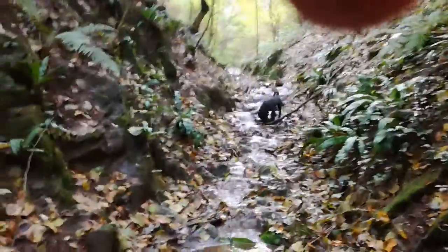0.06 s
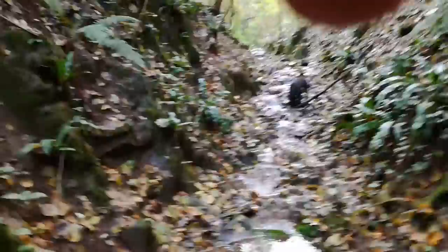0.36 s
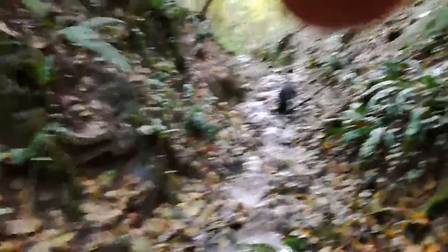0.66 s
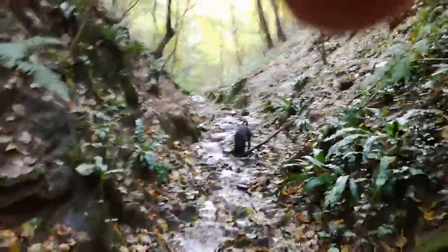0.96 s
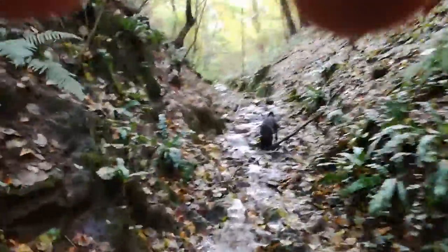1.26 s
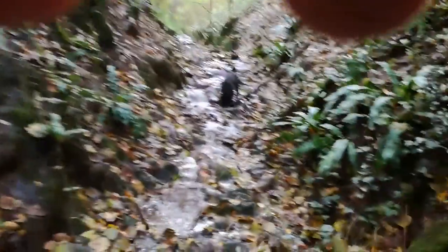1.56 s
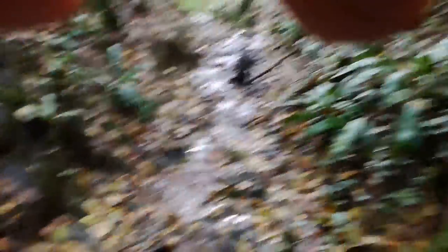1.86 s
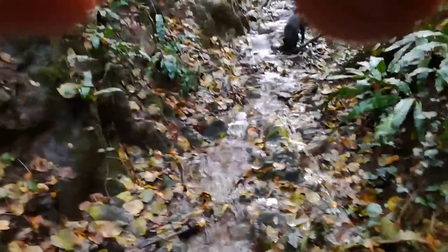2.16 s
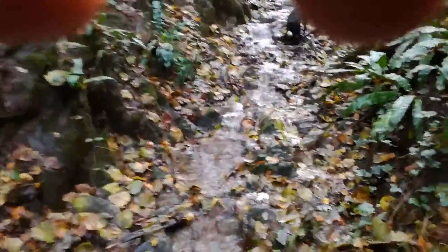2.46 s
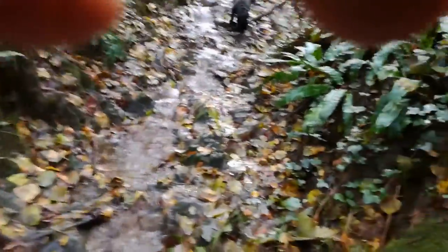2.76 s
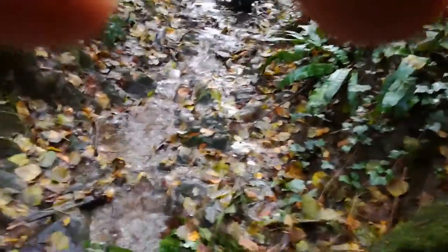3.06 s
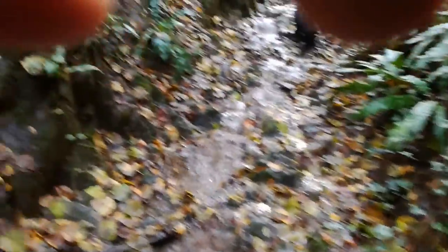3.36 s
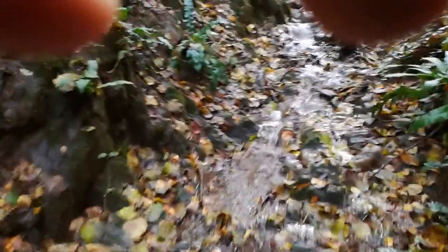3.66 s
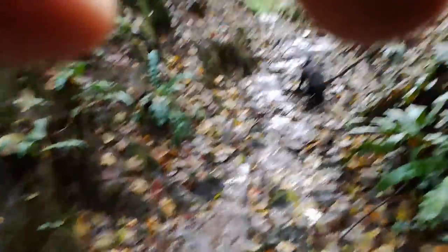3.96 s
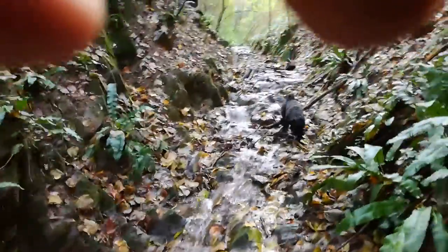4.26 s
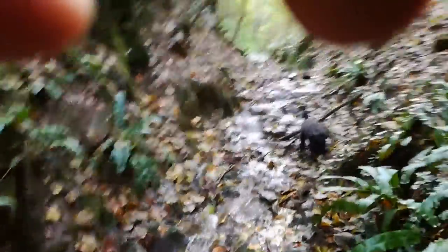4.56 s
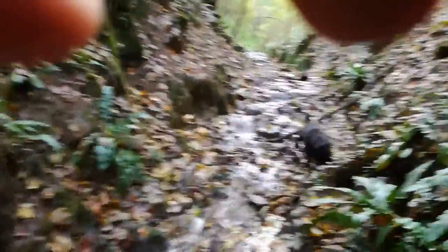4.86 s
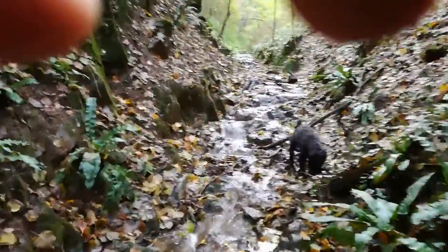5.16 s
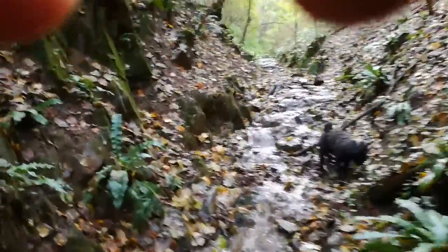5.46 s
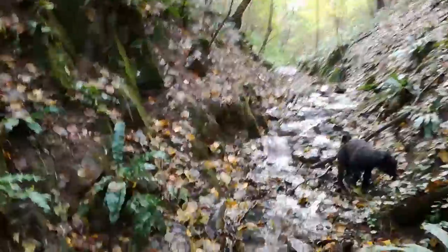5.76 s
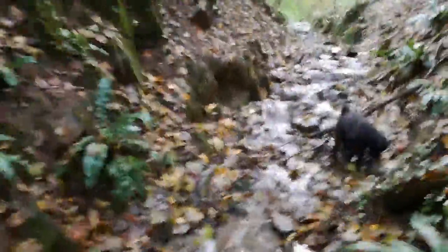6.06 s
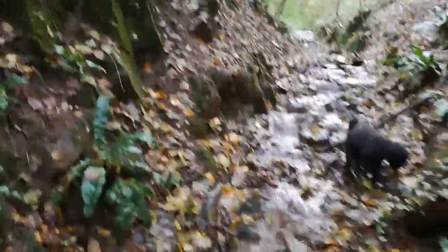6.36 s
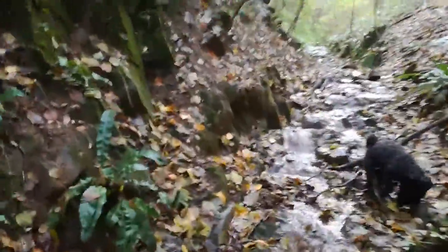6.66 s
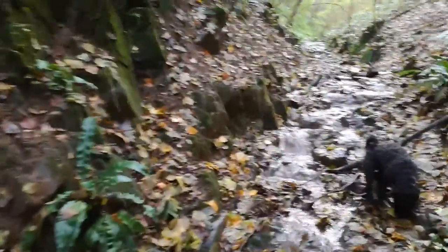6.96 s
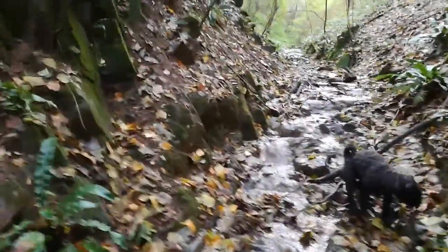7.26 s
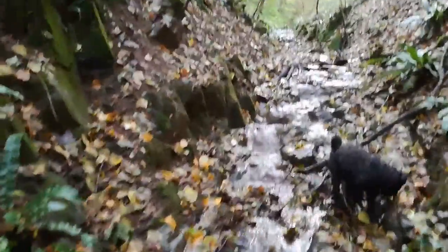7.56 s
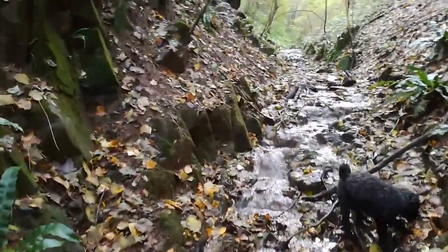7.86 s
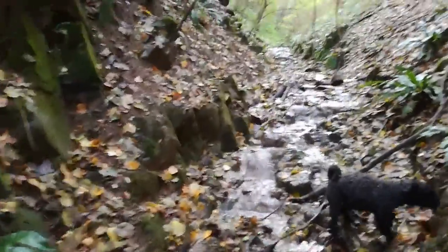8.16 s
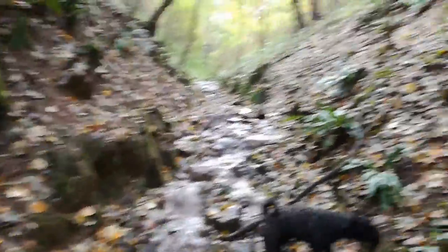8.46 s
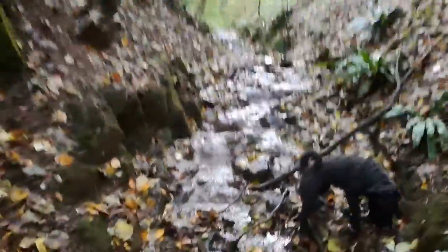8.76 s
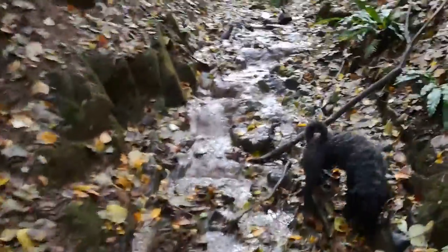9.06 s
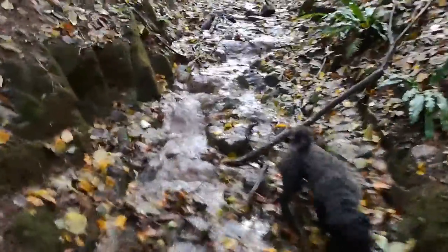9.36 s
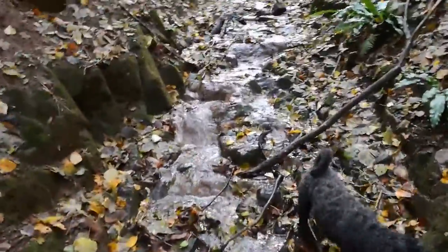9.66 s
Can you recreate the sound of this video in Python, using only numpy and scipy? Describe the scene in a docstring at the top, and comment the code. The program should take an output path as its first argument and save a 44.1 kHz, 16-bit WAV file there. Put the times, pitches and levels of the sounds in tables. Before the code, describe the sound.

A shallow forest stream trickles and bubbles steadily over stones while footsteps rustle wet leaves and snap twigs.

```python
"""A shallow stream trickles over stones in a leafy gully: countless small bubbles ring in the riffles,
each a pocket of air resonating against the water around it. Steps thud, rustle wet leaves, snap twigs
and knock loose stones, and in the second half a dog noses through the leaves. All is heard at the two
microphone ports of a hand-held camera: the left faces away from the water and lies in acoustic shadow,
while a finger slides over the right and cancels a moving band of the water's treble."""
import sys
import numpy as np
from scipy import signal
from scipy.fft import irfft
from scipy.io import wavfile

SR = 44100
rng = np.random.default_rng(int(sys.argv[2]) if len(sys.argv) > 2 else 0)


def materialize(psi):
    """Save the field psi as 16-bit PCM at rate SR to the path in sys.argv[1].

    A 1-D psi becomes a single channel; in a 2-D psi each row is a channel.
    """
    bounded = np.clip(np.atleast_2d(psi).T, -1, 1)
    quanta = np.round(bounded * 32767).astype(np.int16)
    wavfile.write(sys.argv[1], SR, quanta)


N = 427769
TIME = np.arange(N) / SR
PORT_DELAY_S = .00059  # lag of the left port behind the right

# Spectrum of running water. Each row: frequency in Hz, relative level in dB.
WATER_SPECTRUM = [(250, -3), (450, -8.5), (650, -8), (900, -3), (1200, -0.5), (2000, -1.5), (2800, -3),
                  (3700, -5), (5000, -5), (6500, -9.5), (8500, -19.5), (11000, -25.5), (15000, -24.5)]
# The camera is carried up the bed, closer to the riffles.
# Each row: time in seconds, relative water level in dB, extra gain at the left port in dB.
WATER_LEVELS = [(0.0, -42.5, 8.5), (0.45, -42.5, -1), (1.4, -42.5, -2), (3.15, -43, -4.5), (4.3, -41.5, -1),
                (5.05, -41.5, -6), (5.7, -41, -1.5), (8.2, -40.5, -2), (9.7, -38.5, 0.5)]
# Acoustic shadow at the left port. Each row: frequency in Hz, relative gain in dB.
LEFT_SHADOW = [(200, -2), (450, -7), (900, -6), (1300, -6.5), (2200, -13), (3700, -11.5), (5000, -12.5),
               (6500, -15), (8500, -8), (11000, -6), (15000, -1)]
# Likeness of the water at the two ports. Each row: frequency in Hz, coherence from 0 to 1.
PORT_COHERENCE = [(200, 0), (600, 0.6), (1300, 0), (1900, 1), (2600, 0.33), (3500, 0.53), (6000, 0),
                  (10000, 0)]
# The finger slides over the right port and stays. Each row: time in seconds, notch frequency in Hz,
# notch depth scale in dB, gain of the water's top treble at both ports in dB.
FINGER_PATH = [(0, 12000, -0.5, 2.5), (3.3, 11600, -6, 4.5), (5.5, 10000, -4, 2.5), (5.8, 6450, -9, 3),
               (6.3, 4100, -5, 0.5), (7.0, 4300, -10, 0), (7.6, 4700, -10, 1), (8.15, 4560, -8.5, 0.5),
               (8.8, 4540, -4.5, 1), (9.7, 5300, -8, -2.5)]
# Near splashes. Each row: start in seconds, relative level in dB, bubble pitch in Hz.
NEAR_SPLASHES = [(0.5364, -17.5, 4900), (0.595, -20.5, 3950), (0.8673, -18.5, 2240), (0.895, -18.5, 6300),
                 (0.9963, -25, 3800), (1.012, -16, 4240), (1.071, -17.5, 5170), (1.094, -23, 5600),
                 (1.1253, -22, 6450), (1.496, -23, 2000), (1.9305, -21, 4860), (2.0197, -24, 5140),
                 (2.5705, -27, 5600), (2.918, -22, 2240), (4.198, -14.5, 3940), (5.3754, -17, 3140),
                 (5.799, -22, 1730), (5.997, -17.5, 2980), (6.528, -21, 6100), (6.931, -28, 5700),
                 (7.6235, -20.5, 5300), (8.467, -20, 7600)]
# Single bubbles that ring clear of the rest. Each row: start in seconds, level in dB, pitch in Hz.
CLEAR_BUBBLES = [(0.37, -28, 2110), (1.547, -28, 2100), (1.847, -22.5, 2310), (2.163, -34, 996),
                 (2.383, -30, 2740), (2.652, -39, 590), (2.807, -36, 1360), (3.045, -27, 2380),
                 (3.154, -34, 1500), (3.387, -32, 1096), (5.098, -26.5, 996), (5.208, -30, 3060),
                 (5.597, -25.5, 3050), (6.313, -27, 1050), (6.8, -28.5, 1680), (7.273, -29, 3340),
                 (7.36, -30.5, 830), (7.808, -33, 1025), (7.853, -26.5, 3190), (8.355, -31, 2000),
                 (8.879, -28, 1680), (9.061, -26.5, 3200), (9.145, -29.5, 905), (9.23, -26, 2210),
                 (9.454, -27, 1400)]
# Twigs breaking. Each row: start in seconds, relative level in dB, pitch in Hz, 60 dB decay time of
# the tearing in seconds, left-port gain in dB, treble gain in dB, level of the woody ring in dB.
TWIG_SNAPS = [(0.7193, -21, 3670, 0.039, 12.5, -6, -30), (0.722, -9, 3840, 0.042, -7, 2, 1),
              (0.7312, -26, 3930, 0.045, 8, 14, -12), (3.728, -21, 3200, 0.027, -5, -1, -20),
              (3.765, -18.5, 3820, 0.023, -15, 0, -10), (3.773, -18, 1190, 0.02, 1.5, -10, -21),
              (4.0752, -10.5, 4130, 0.03, 0, -0.5, -18), (4.8302, -9, 3680, 0.02, -2, 3.5, -15)]
# Spectrum of breaking wood. Each row: frequency in Hz, relative level in dB.
WOOD_SPECTRUM = [(100, -43), (600, -11.5), (1300, -8), (1900, 3.5), (2600, 1), (3700, -9.5), (5200, 0),
                 (6500, -5.5), (8200, -9.5), (11000, -19), (16000, -27)]
# Bending modes of a twig. Each row: ratio to its pitch, level in dB, 60 dB decay time in seconds.
BENDING_MODES = [(0.99, 1, 0.031), (.55, -5, 0.023)]
# Wet leaves pressed and brushed. Each row: middle in seconds, nominal length in seconds,
# relative level in dB, crisp swish relative to that level in dB.
LEAF_RUSTLES = [(0.01, 0.15, -35, -20), (0.914, 0.056, -30, -27), (0.986, 0.12, -35, -28),
                (1.712, 0.076, -28.5, -22), (3.394, 0.11, -36.5, -15), (3.524, 0.13, -34, -9),
                (3.843, 0.08, -33.5, -27), (3.923, 0.061, -27, -21), (4.121, 0.061, -26.5, -24),
                (4.407, 0.35, -37, -17), (4.797, 0.098, -26, -20), (5.604, 0.27, -33.5, -22),
                (9.243, 0.1, -46, -13)]
# Spectrum of wet leaves, also used for spray. Each row: frequency in Hz, relative level in dB.
WET_SPECTRUM = [(150, -14), (500, -6), (1000, 7), (1800, 11), (4000, 12.5), (6500, 4.5), (10000, -4.5),
                (16000, -23)]
# Spectrum of the swish of drier leaves. Each row: frequency in Hz, relative level in dB.
SWISH_SPECTRUM = [(3000, -27), (8000, 18), (16000, 5)]
# Soft footfalls. Each row: time in seconds, relative level in dB, pitch in Hz,
# 60 dB decay time in seconds, share of hollow ring from 0 to 1.
FOOTFALLS = [(0.719, -42.5, 210, 0.11, 0.1), (3.608, -32, 270, 0.065, .1), (3.769, -37.5, 390, 0.068, 0.3),
             (3.908, -42.5, 307, 0.13, 0.3), (4.075, -19.5, 220, 0.024, 0), (4.101, -30, 268, 0.05, 0.8),
             (4.779, -42.5, 375, 0.14, 0), (5.176, -46.5, 332, .09, 0), (6.407, -46.5, 302, 0.11, 0),
             (6.585, -42, 220, .08, 0.38), (7.199, -39.5, 200, 0.12, 0), (7.729, -47, 179, .09, 0.1),
             (8.645, -41, 125, 0.13, 0), (9.354, -43, 292, 0.12, 0)]
# Loose stones knocking, some rocking back a moment later.
# Each row: start in seconds, relative level in dB, pitch factor, left-port gain in dB.
STONE_KNOCKS = [(3.609, -32, 0.43, -3), (4.0758, -28, 0.78, -4), (4.119, -31, 1.53, -3),
                (4.829, -31, 0.95, -3.5), (6.1486, -27, 0.92, 0.5), (6.154, -39, 1.02, 3),
                (8.5486, -29, 1.02, 4.5), (8.555, -32.5, 0.81, 3.5)]
# Modes of a stone. Each row: base frequency in Hz, relative level in dB, 60 dB decay time in seconds.
STONE_MODES = [(241, -10, 0.05), (590, -13.5, 0.058), (843, -12.5, 0.057), (1073, 5, 0.046),
               (1536, -4, 0.035), (1826, -5, 0.053), (2325, -3, 0.046), (2750, -6, 0.042)]
# Spectrum of grit between stones. Each row: base frequency in Hz, relative level in dB.
GRIT_SPECTRUM = [(60, -35), (140, -29), (240, -11), (350, 0), (500, -21.5), (800, 11), (1200, 4.5),
                 (2400, -7), (3600, -30), (8000, -47)]
# Dry leaves and stalks cracking.
# Each row: start in seconds, peak level in dB, pitch in Hz, 60 dB decay time in seconds.
LEAF_CRACKS = [(0.9465, -22.5, 5300, .012), (1.348, -41, 6500, .012), (2.692, -26, 4760, 0.011),
               (4.892, -25, 2600, 0.012), (6.794, -28, 5840, 0.045), (6.985, -24, 10200, 0.016),
               (7.727, -33.5, 8500, 0.053), (7.893, -23.5, 2600, .03), (8.1625, -35, 1840, 0.0066),
               (8.208, -32, 3000, 0.0037), (8.4896, -33, 2000, .004), (8.6758, -10, 5870, 0.0088),
               (8.752, -24.5, 5500, .02), (8.873, -28, 4500, 0.023), (9.1133, -17.5, 1800, 0.0055),
               (9.225, -39, 8900, 0.017), (9.243, -23, 4200, 0.032), (9.318, -19, 4600, 0.026),
               (9.458, -43, 2000, 0.0072), (9.576, -22.5, 4950, 0.017), (9.6583, -23.5, 3820, .015)]
# Spectrum of those cracks. Each row: frequency in Hz, relative level in dB.
DRY_LEAF_SPECTRUM = [(200, -22), (1200, -2), (4000, 0), (8000, -4), (11000, -10), (16000, -17)]
# The dog comes nearer. Each row: time in seconds, level of its crackling in dB.
DOG_LEVELS = [(5.5, -70), (6.4, -59), (7.7, -57), (8.3, -61), (9.1, -58), (9.7, -57)]
# Spectrum of leaves under its paws. Each row: frequency in Hz, relative level in dB.
PAW_SPECTRUM = [(500, -25), (3000, -3), (4300, -10), (5800, 0), (8000, -3), (10000, -3), (12000, -12),
                (16000, -17)]
# Spectrum of air and handling on the camera body. Each row: frequency in Hz, relative level in dB.
HANDLING_SPECTRUM = [(15, 11), (30, 0.5), (50, 3.5), (80, 4), (120, -1), (170, -3.5), (260, -21),
                     (500, -33), (2000, -59)]
# The hand shifts its grip. Each row: middle in seconds, nominal length in seconds, level in dB.
GRIP_SHIFTS = [(1.135, 0.1, -58), (1.42, 0.47, -71), (9.402, 0.19, -64)]
# Spectrum of a low hollow murmur. Each row: frequency in Hz, relative level in dB.
MURMUR_SPECTRUM = [(60, -21), (150, 1.5), (210, 4), (270, 4), (340, 6.5), (420, -0.5), (600, -11.5),
                   (2000, -49)]
# The murmur swells now and then, often with the steps.
# Each row: middle in seconds, nominal length in seconds, level in dB.
MURMUR_SWELLS = [(0.0, 0.44, -63), (1.735, 0.24, -65), (2.86, 0.15, -63.5), (4.21, 0.42, -61.5),
                 (5.25, 1, -69), (6.89, 1, -66.5), (8.51, 0.65, -60.5)]


def stream(level_db=1, low_cut_hz=330):
    """Partial coherence: direct water sound reaches both ports, sound scattered by the banks the left."""
    hz, t, (direct, banks) = signal.stft(np.array([trickle(), trickle()]), SR, nperseg=512)
    hz = hz[:, None]
    flow_db, left_db = follow(WATER_LEVELS, t)
    *_, fizz_db = follow(FINGER_PATH, t)
    treble = np.clip((hz - 6000) / 4500, 0, 1)
    water = unit_rms(gain(spectrum_at(WATER_SPECTRUM, hz))) * gain(level_db + flow_db + fizz_db * treble)
    coherence = np.clip(spectrum_at(PORT_COHERENCE, hz), 0, 1)
    delay = np.exp(-2j * np.pi * hz * PORT_DELAY_S)
    left = coherence * direct * delay + np.sqrt(1 - coherence ** 2) * banks
    left *= gain(spectrum_at(LEFT_SHADOW, hz) + left_db)
    right = direct * gain(finger_notch_db(hz, t))
    low_cut = hz ** 2 / (hz ** 2 + low_cut_hz ** 2)
    return signal.istft(np.array([left, right]) * water * low_cut, SR, nperseg=512)[1][:, :N]


def trickle(wash_db=-3, spatter_db=-3, ticks_db=-16):
    """Incoherent sum: bubbles, wavelets, tiny bursting drops and the wash of far riffles add in power."""
    drops = impulses(450, 1.9, 4.9)
    ticks = unit_rms(colour(drops, [(300, -15), (2500, -4), (8000, -14), (16000, -15)]))
    wash = gain(wash_db) * rng.standard_normal(N)
    return unit_rms(bubble_cloud() + gain(spatter_db) * spatter() + gain(ticks_db) * ticks + wash)


def bubble_cloud(per_s=95, cycles=38, damped_hz=9000, gurgles_per_s=11, gurgle_s=.018, gurgle_share=.3):
    """Resonance rises as size falls: big bubbles are fewer and ring longer, the tiniest only tick."""
    out = np.zeros(N + SR)
    gurgles = rng.random(int(gurgles_per_s * N / SR)) * N  # moments where bubbles bunch
    for hz in np.geomspace(560, 13000, 22):
        ring_scale = 1 / (1 + (hz / damped_hz) ** 4)
        shapes = [bubble(hz * (1 + 0.033 * k), ring_scale * cycles * 1.183 ** k / hz, rise=0.024)
                  for k in range(-2, 3)]
        count = int(per_s * min(hz / 1500, 1.2) ** 1.3 * N / SR) + 1
        when, variant, sign, size, bunched, lag = rng.random((2000, 6))[:count].T
        in_gurgle = gurgles[(when * len(gurgles)).astype(int)] - np.log(lag + 1e-6) * gurgle_s * SR
        starts = np.where(bunched < gurgle_share, in_gurgle, when * N).astype(int)
        spread_db = np.interp(hz, [2200, 4000], [4, 3.5])
        heights = unit_rms(gain(spread_db * np.minimum(-np.log(size + 1e-12), 4.31)))
        heights *= np.sign(sign - .5)
        heights *= hz / np.sqrt(ring_scale * count)  # brief rings need more height for equal energy
        for at, kind, height in zip(starts, (variant * len(shapes)).astype(int), heights):
            out[at:at + len(shapes[kind])] += height * shapes[kind]
    return unit_rms(out[:N])


def bubble(hz, t60, rise=0.048):
    """A damped oscillator: trapped air rings and dies, its pitch rising as it nears the surface."""
    t = np.arange(int(t60 * SR) + 2) / SR
    envelope = gain(-60 * t / t60) * (1 - np.exp(-t * hz))
    return envelope * np.sin(2 * np.pi * hz * t * (1 + rise * t / t60))


def spatter():
    """Impact noise: wavelets slap the stones in puffs of spray that start at once and fade quickly."""
    slaps = noise_bursts(per_s=110, spread_db=1.5, cap=3.2, fade_s=0.012)
    return unit_rms(colour(slaps, [(300, -21), (1200, 0), (3000, 1.5), (7000, 6), (16000, -0.5)]))


def splashes(cycles=22, bubble_db=-0.5, spray_db=-13, spray_t60=0.044, pan_db=-16.5):
    """Air entrainment: a drop slaps the surface, throws a little spray and traps a ringing bubble."""
    out, t = np.zeros((2, N)), np.arange(4096) / SR
    for start, db, hz in NEAR_SPLASHES + drips():
        slap = rng.standard_normal(len(t)) * gain(-60 * t / spray_t60)
        spray = colour(slap, WET_SPECTRUM, hz, peak_db=12, octaves=0.32)
        add(out, start, ports(gain(db + spray_db) * spray, pan_db))
        add(out, start, ports(gain(db + bubble_db) * bubble(hz, cycles / hz), pan_db))
    return out


def drips(per_s=3, level_db=-29, spread_db=1, low_hz=1380, high_hz=5500):
    """Independent random events: small splashes, each with its own start, level and pitch."""
    when, strength, pitch = rng.random((200, 3))[:int(per_s * N / SR)].T
    levels_db = level_db + spread_db * (2 * strength - 1)
    return list(zip(when * N / SR, levels_db, low_hz * (high_hz / low_hz) ** pitch))


def plops(cycles=60, pan_db=-7):
    """Constant Q: single bubbles ring for the same number of cycles, so the big, low ones last longer."""
    out = np.zeros((2, N))
    for start, db, hz in CLEAR_BUBBLES:
        add(out, start, ports(gain(db) * bubble(hz, cycles / hz, rise=0.16), pan_db))
    return out


def twig_snaps(crack_db=11, fibres_db=-3, tail_db=-25, splinters_db=-19, splinter_t60=0.11):
    """Brittle fracture: a sharp break, tearing fibres and late splinters, while bending modes ring."""
    out, t = np.zeros((2, N)), np.arange(8192) / SR
    for start, db, hz, t60, pan_db, treble_db, ring_db in TWIG_SNAPS:
        tearing = gain(fibres_db - 60 * t / t60) + gain(tail_db - 60 * t / (3 * t60))
        splinters = unit_rms(impulses(500, 2.4, 3)[:len(t)]) * gain(splinters_db - 60 * t / splinter_t60)
        force = (tearing + splinters) * rng.standard_normal(len(t))
        force[0] += gain(crack_db)
        wood = [(f, level + treble_db * (f > 6000)) for f, level in WOOD_SPECTRUM]
        crack = colour(force, wood, hz, peak_db=18, octaves=0.32)
        ring = gain(ring_db) * modal_ring(BENDING_MODES, hz, t)
        add(out, start, shadowed_ports(gain(db) * (crack + ring), pan_db))
    return out


def rustles(level_db=-5.5, hiss_db=-3, clump_db=3, pan_db=-3):
    """Friction noise: leaves crackle in loose clumps under each step; drier ones add a crisp swish."""
    pressure = sum(gain(db) * swell(s, length) for s, length, db, _ in LEAF_RUSTLES)
    crispness = sum(gain(db + crisp_db) * swell(s, length) for s, length, db, crisp_db in LEAF_RUSTLES)
    clumps = unit_rms(gain(clump_db * wander(44, 130)))
    sides = []
    for _ in range(2):
        ticks = unit_rms(impulses(1500, 4.6, 5.1) * rng.choice([-1, 1], N))
        crackle = (ticks + gain(hiss_db) * rng.standard_normal(N)) * clumps
        wet, crisp = colour(crackle, WET_SPECTRUM), colour(crackle, SWISH_SPECTRUM)
        sides.append(pressure * wet + crispness * crisp)
    left, right = sides
    return gain(level_db) * np.array([gain(pan_db) * colour(left, LEFT_SHADOW), right])


def footfalls(level_db=-1, attack_s=0.0028):
    """Damped impact: soft ground gives a dull push, with a low resonance where it is hollow."""
    out, t = np.zeros((2, N)), np.arange(SR // 2) / SR
    for start, db, hz, t60, hollow in FOOTFALLS:
        ground = signal.butter(2, [hz * 0.49, hz * 1.36], "band", fs=SR, output="sos")
        earth = unit_rms(signal.sosfilt(ground, rng.standard_normal(len(t))))
        note = unit_rms(np.sin(2 * np.pi * hz * t))
        push = gain(db + level_db - 60 * t / t60) * (1 - np.exp(-t / attack_s))
        thud = push * unit_rms((1 - hollow) * earth + hollow * note)
        add(out, start - attack_s, ports(thud, pan_db=0, delay_s=0))
    return out


def stone_knocks(ring_db=-2, grind_db=-6, grind_t60=0.14, low_cut_hz=180):
    """Impact excites modes: a stone tips onto its neighbour, rings and grinds briefly into place."""
    out, t = np.zeros((2, N)), np.arange(8192) / SR
    for start, db, pitch, pan_db in STONE_KNOCKS:
        ring = gain(ring_db) * modal_ring(STONE_MODES, pitch, t)
        grinding = rng.standard_normal((2, len(t))) * gain(grind_db - 60 * t / grind_t60)
        grit = np.array([colour(side, np.array(GRIT_SPECTRUM) * [pitch, 1]) for side in grinding])
        add(out, start, gain([[db + pan_db], [db]]) * (ring + grit))
    return signal.sosfilt(signal.butter(2, low_cut_hz, "high", fs=SR, output="sos"), out)


def leaf_cracks(crack_db=9, pan_db=-3):
    """A brief force has a broad spectrum: a dry leaf gives way with a bright tick and a short crumble."""
    out, t = np.zeros((2, N)), np.arange(4096) / SR
    for start, db, hz, t60 in LEAF_CRACKS:
        force = rng.standard_normal(len(t)) * gain(-60 * t / t60)
        force[0] = gain(crack_db)
        tick = colour(force, DRY_LEAF_SPECTRUM, hz, peak_db=10, octaves=0.45)
        add(out, start, shadowed_ports(gain(db) * tick / abs(tick).max(), pan_db))
    return out


def dog_paws(clump_db=3, pan_db=-2):
    """Many small fractures: leaves break under the dog in clumps of tiny crisp ticks."""
    ticks = colour(noise_bursts(per_s=70, spread_db=3, cap=1.47, fade_s=.0015), PAW_SPECTRUM)
    clumps = gain(clump_db * wander(5.3, 9.4))
    level_db, = follow(DOG_LEVELS, TIME)
    return shadowed_ports(unit_rms(ticks * clumps) * gain(level_db), pan_db)


def rumble(spectrum, swells, rest_db, lumpy_db=2.5):
    """Amplitude-modulated noise: a lumpy low bed that swells now and then, alike at both ports."""
    level = gain(rest_db) + sum(gain(db) * swell(s, length) for s, length, db in swells)
    noise = unit_rms(colour(rng.standard_normal(N), spectrum))
    return noise * level * gain(-lumpy_db * wander(0.42, 16))


def gully_echo(x, t60=.15, wet_db=-19, echoes_per_s=2500):
    """Diffuse reflection: banks and trunks return a short, thin echo, different at each port."""
    t = np.arange(SR // 2) / SR
    taps = rng.standard_normal((2, len(t))) * (rng.random((2, len(t))) < echoes_per_s / SR) * (t > .004)
    taps = signal.lfilter([1], [1, -.5], taps * gain(-60 * t / t60))
    return gain(wet_db) * signal.fftconvolve(x, taps / np.linalg.norm(taps[0]), axes=1)[:, :N]


def finger_notch_db(hz, t):
    """Interference: the finger's reflection cancels one band and lifts another about an octave up."""
    notch_hz, depth_db, _ = follow(FINGER_PATH, t)
    octaves = np.log2((hz + 1) / notch_hz)
    skirt = hump(octaves, np.where(octaves < 0, 0.24, 0.55))  # steeper on the low side
    core = .45 * hump(octaves, .09)
    lift = .42 * hump(octaves - np.log2(2.2), .22)
    return depth_db * (skirt + core - lift)


def ports(x, pan_db, delay_s=PORT_DELAY_S):
    """Path difference: the left port hears a sound delay_s after the right, with a gain of pan_db."""
    late = np.r_[np.zeros(round(delay_s * SR)), x][:len(x)]
    return np.array([gain(pan_db) * late, x])


def shadowed_ports(x, pan_db):
    """Acoustic shadow: a near sound is coloured on its way to the left port."""
    left, right = ports(x, pan_db)
    return np.array([colour(left, LEFT_SHADOW), right])


def modal_ring(modes, pitch, t):
    """Free vibration: a sum of decaying sines, their frequencies multiplied by pitch."""
    return sum(gain(db - 60 * t / t60) * np.sin(2 * np.pi * f * pitch * t) for f, db, t60 in modes)


def impulses(per_s, spread_db, cap):
    """A Poisson process: many small impulses and a few large, up to cap times spread_db."""
    chance, size = rng.random(N), np.zeros(N)
    hit = chance < per_s / SR
    size[hit] = gain(spread_db * np.minimum(-np.log(chance[hit] * SR / per_s + 1e-12), cap))
    return size


def noise_bursts(per_s, spread_db, cap, fade_s):
    """Exponential decay: each random impulse starts a puff of noise with time constant fade_s."""
    envelope = signal.lfilter([1], [1, -np.exp(-1 / (fade_s * SR))], impulses(per_s, spread_db, cap))
    return envelope * rng.standard_normal(N)


def wander(slow_hz, fast_hz, size=4096):
    """Pink fluctuation of rms 1: equal power in each octave between two rates."""
    hz = np.arange(1, size + 1) * SR / N
    shape = 1 / np.sqrt(hz * (1 + (slow_hz / hz) ** 4) * (1 + (hz / fast_hz) ** 4))
    slow = irfft(np.r_[0, shape * (rng.standard_normal(size) + 1j * rng.standard_normal(size))])
    return unit_rms(np.interp(np.linspace(0, len(slow), N), np.arange(len(slow)), slow))


def colour(x, spectrum, peak_hz=1000, peak_db=0, octaves=.3):
    """Minimum-phase filtering at unit energy: a spectrum with one optional resonant hump."""
    hz = np.fft.rfftfreq(2048, 1 / SR)
    db = spectrum_at(spectrum, hz) + peak_db * hump(np.log2((hz + 1) / peak_hz), octaves)
    log_gain = np.log(gain(np.r_[db, db[-2:0:-1]]))
    taps = np.fft.ifft(np.exp(signal.hilbert(log_gain).conj())).real
    return signal.oaconvolve(x, taps / np.linalg.norm(taps))[:len(x)]


def swell(middle_s, length_s):
    """A Gaussian envelope: a smooth rise and fall of height 1."""
    return np.exp(-np.minimum(2 * np.pi * ((TIME - middle_s) / length_s) ** 2, 20))


def hump(offset, width):
    """A Gaussian bell that falls to 1/e at one width."""
    return np.exp(-(offset / width) ** 2)


def spectrum_at(points, hz):
    """Interpolation on a log-frequency axis."""
    f, value = np.transpose(points)
    return np.interp(np.log(hz + 1), np.log(f + 1), value)


def follow(rows, t):
    """Linear interpolation of every column at the times t."""
    times, *columns = np.transpose(rows)
    return [np.interp(t, times, column) for column in columns]


def gain(db):
    """Decibels as an amplitude ratio."""
    return 10 ** (np.asarray(db) / 20)


def unit_rms(x):
    """Normalisation to an rms of 1."""
    return x / np.sqrt(np.mean(x ** 2) + 1e-20)


def add(mix, start_s, sound):
    """Superposition: a two-channel sound joins the mix at start_s."""
    part = mix[:, max(round(start_s * SR), 0):][:, :sound.shape[1]]
    part += sound[:, :part.shape[1]]


def scene():
    """Sound pressures add: the stream, leaves, near impacts with their echo, and two low beds."""
    impacts = twig_snaps() + leaf_cracks() + dog_paws() + stone_knocks() + footfalls()
    impacts += splashes() + plops()
    water = stream()
    handling = rumble(HANDLING_SPECTRUM, GRIP_SHIFTS, rest_db=-68)
    murmur = rumble(MURMUR_SPECTRUM, MURMUR_SWELLS, rest_db=-74)
    return water + rustles() + impacts + gully_echo(impacts) + handling + murmur


def record(dry, edge_hz=16000):
    """Limiting: the signal is held within full scale, then low-pass filtered."""
    low_pass = signal.firwin(511, edge_hz, window=("kaiser", 9), fs=SR)
    return signal.oaconvolve(np.clip(dry, -1, 1), low_pass[None], "same")


dry = scene()
out = record(dry)
materialize(out)
```